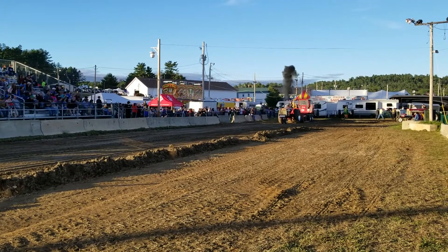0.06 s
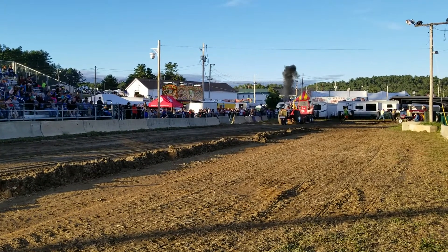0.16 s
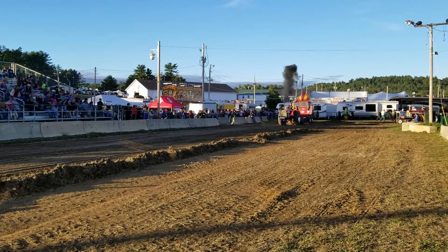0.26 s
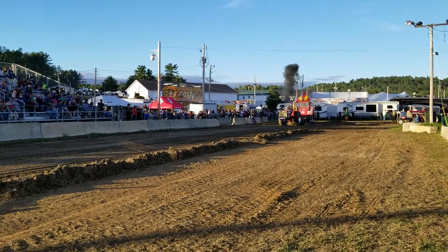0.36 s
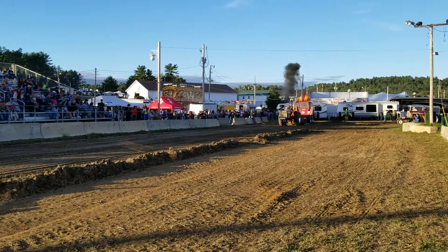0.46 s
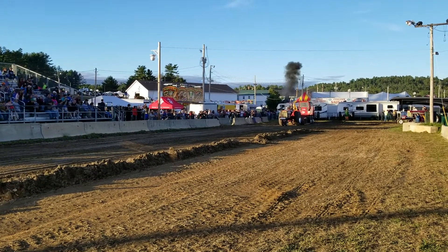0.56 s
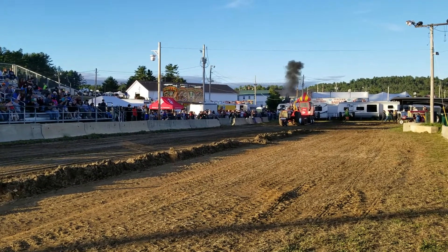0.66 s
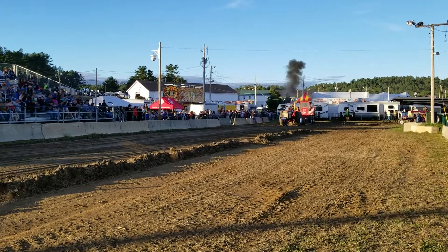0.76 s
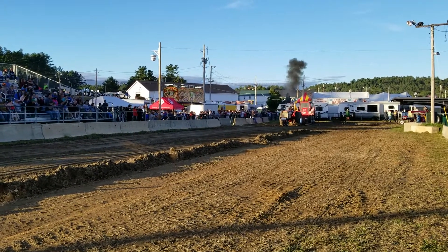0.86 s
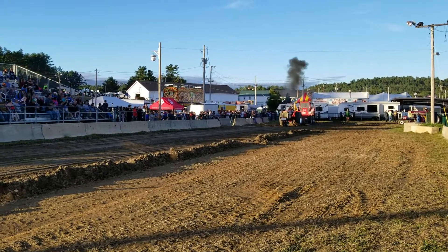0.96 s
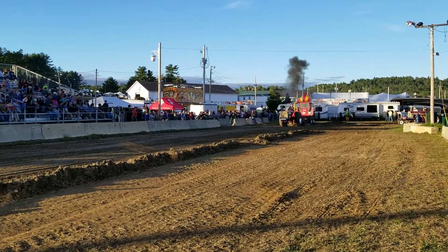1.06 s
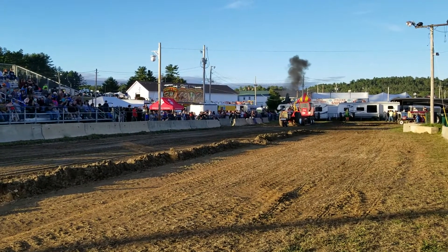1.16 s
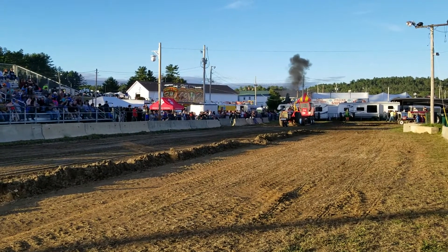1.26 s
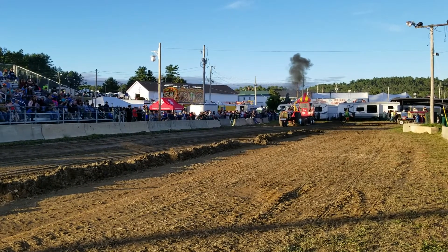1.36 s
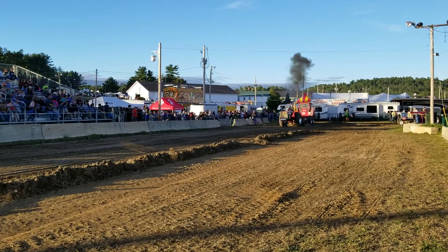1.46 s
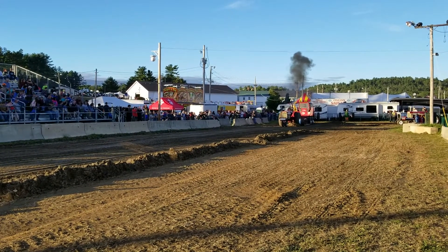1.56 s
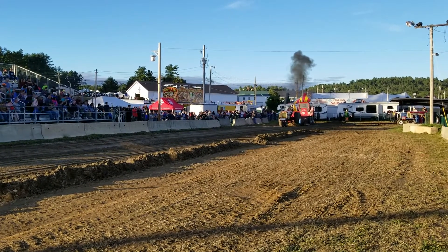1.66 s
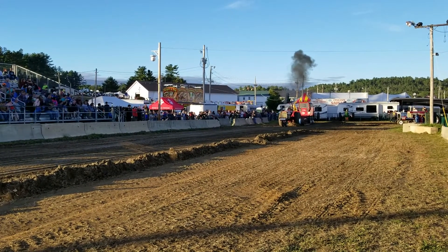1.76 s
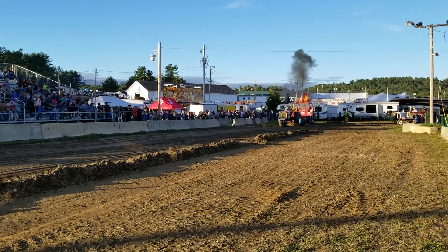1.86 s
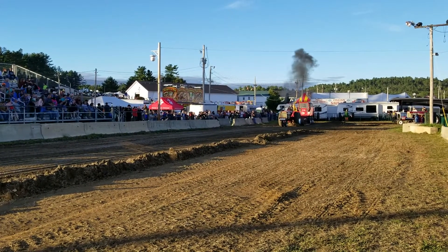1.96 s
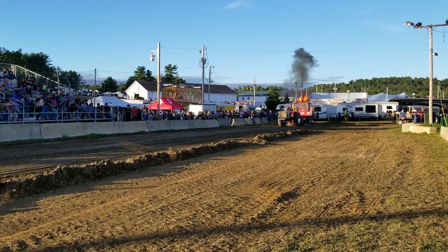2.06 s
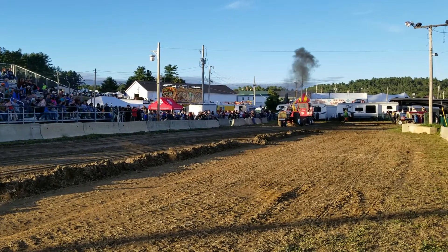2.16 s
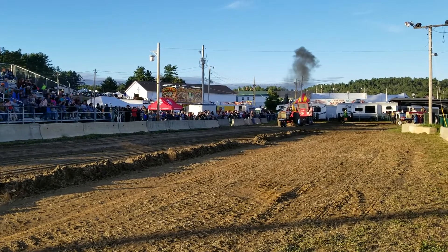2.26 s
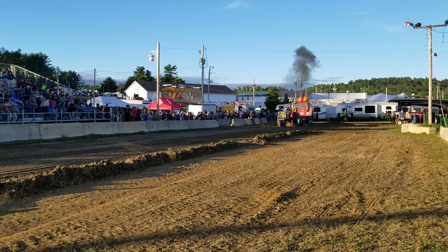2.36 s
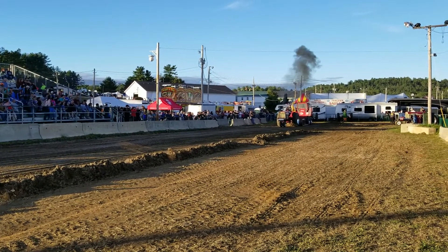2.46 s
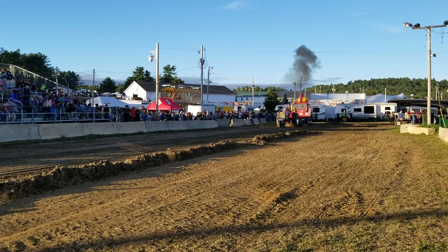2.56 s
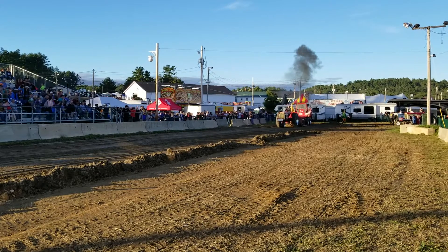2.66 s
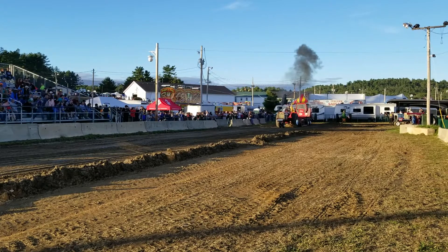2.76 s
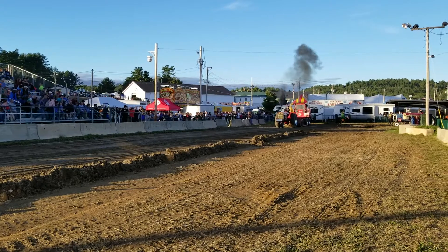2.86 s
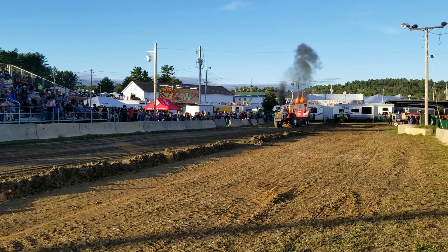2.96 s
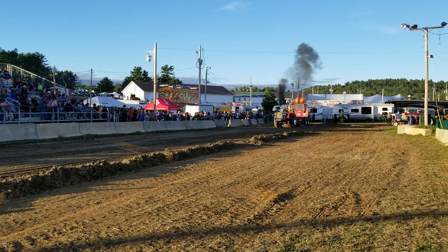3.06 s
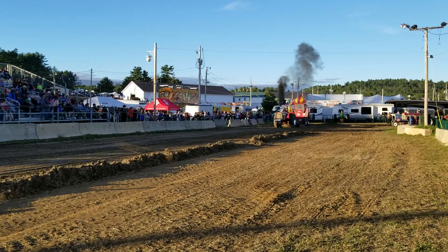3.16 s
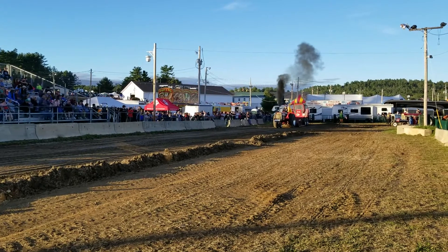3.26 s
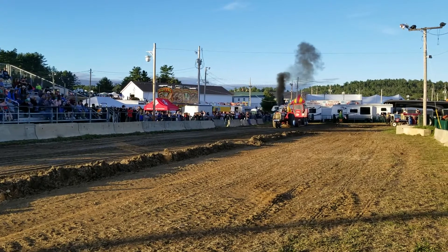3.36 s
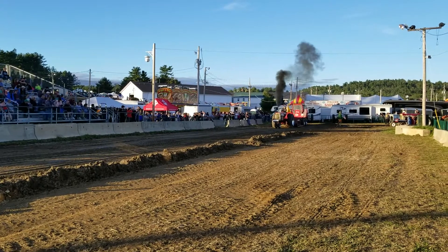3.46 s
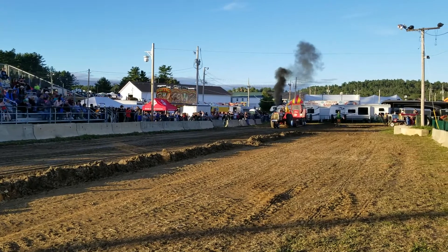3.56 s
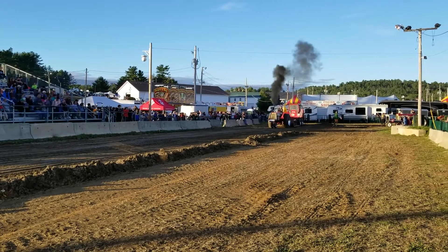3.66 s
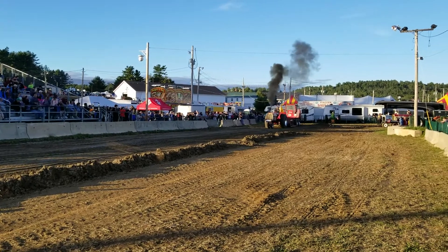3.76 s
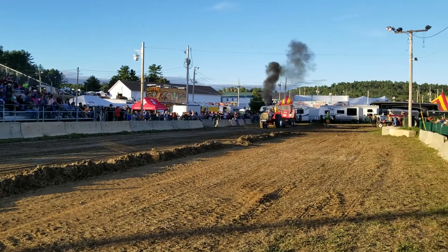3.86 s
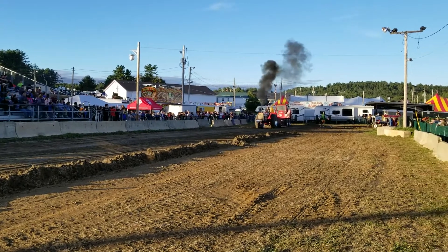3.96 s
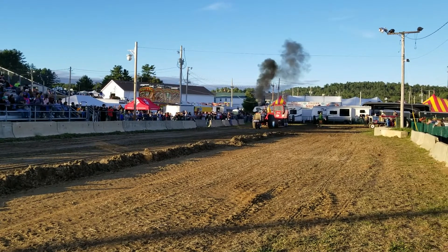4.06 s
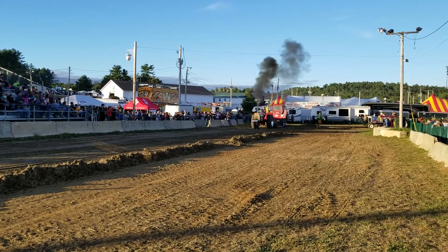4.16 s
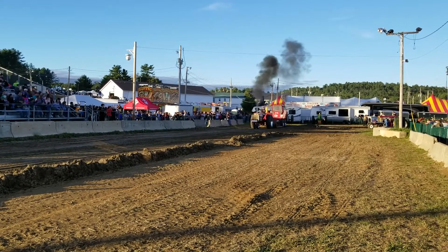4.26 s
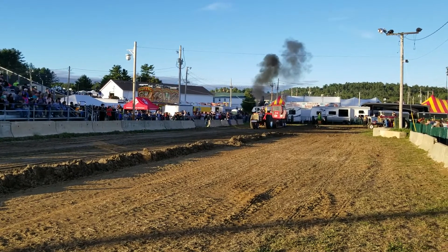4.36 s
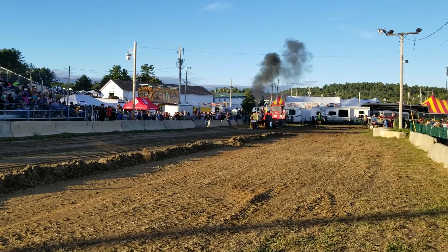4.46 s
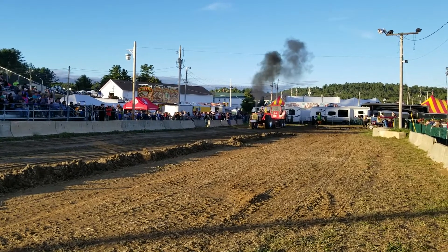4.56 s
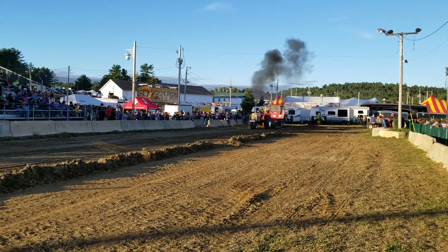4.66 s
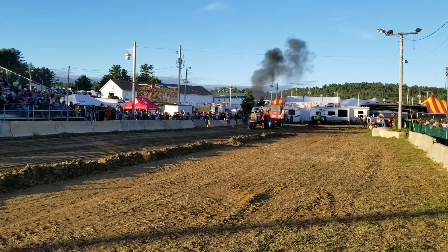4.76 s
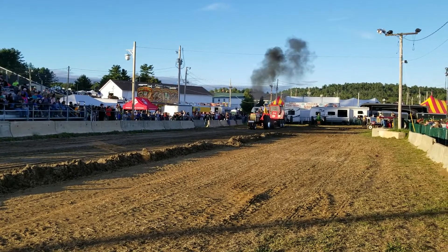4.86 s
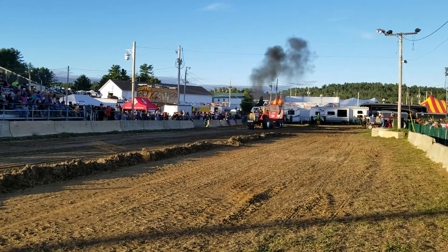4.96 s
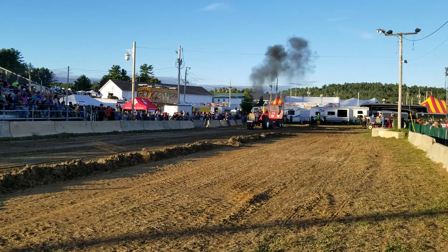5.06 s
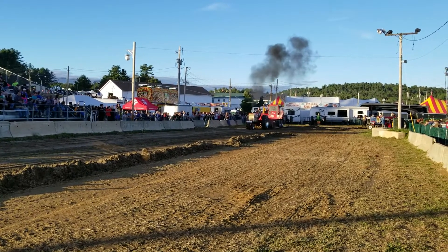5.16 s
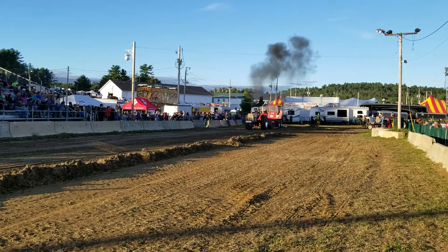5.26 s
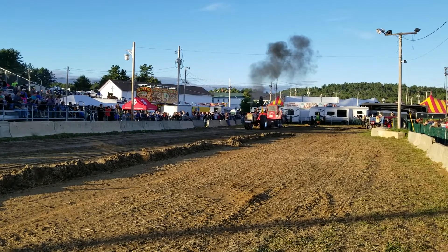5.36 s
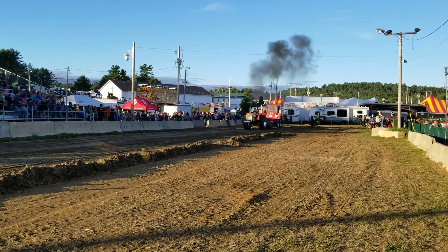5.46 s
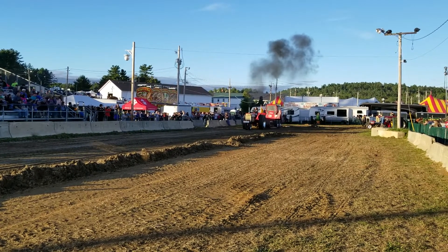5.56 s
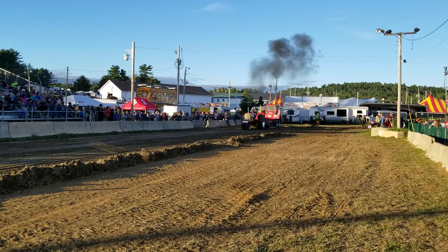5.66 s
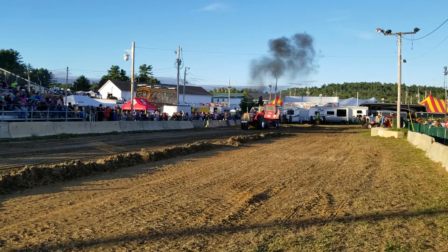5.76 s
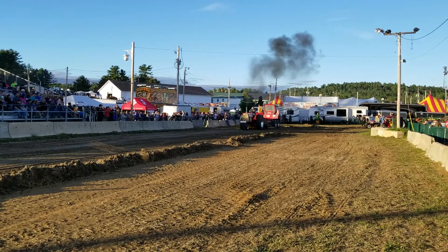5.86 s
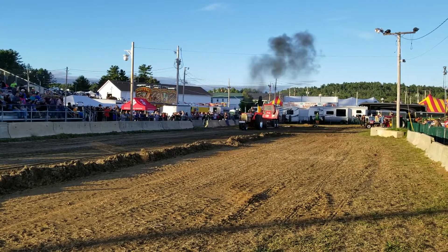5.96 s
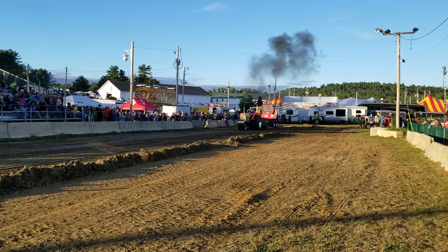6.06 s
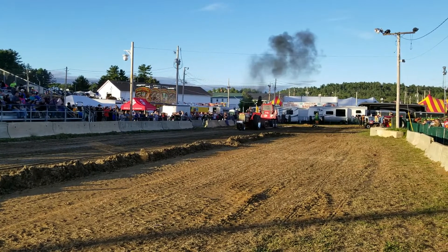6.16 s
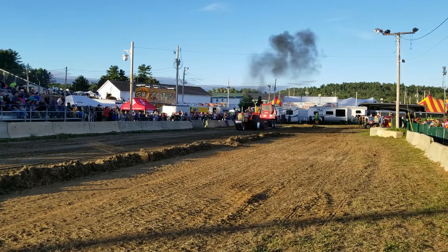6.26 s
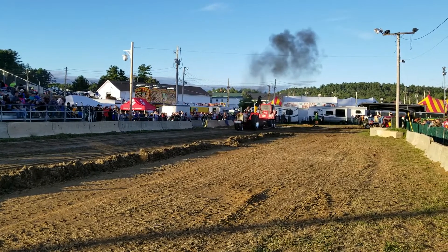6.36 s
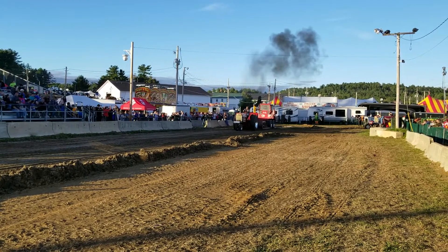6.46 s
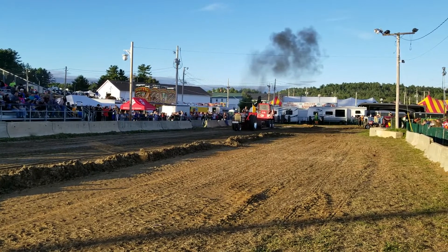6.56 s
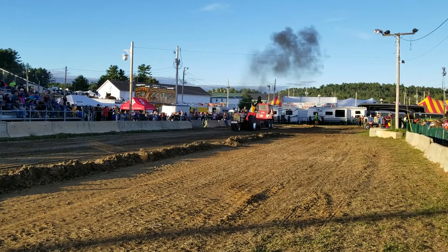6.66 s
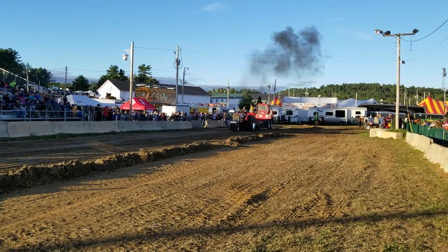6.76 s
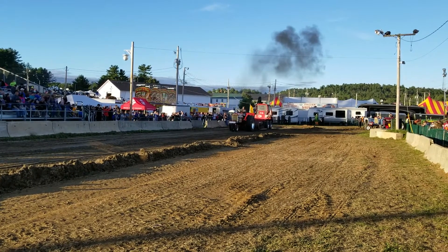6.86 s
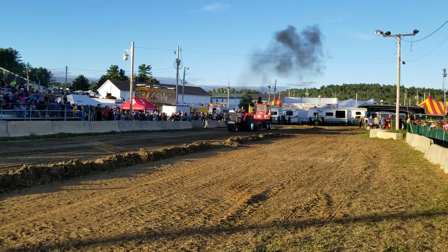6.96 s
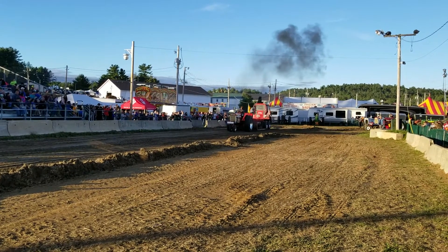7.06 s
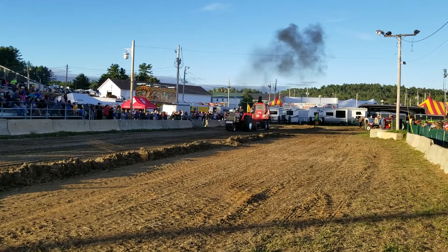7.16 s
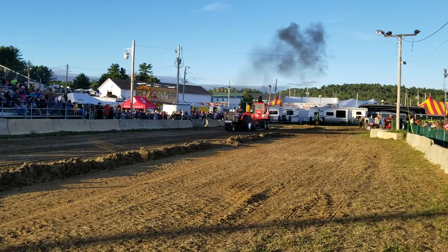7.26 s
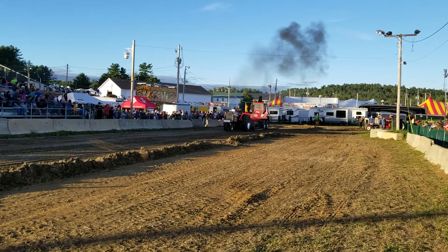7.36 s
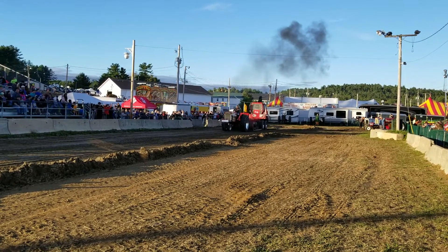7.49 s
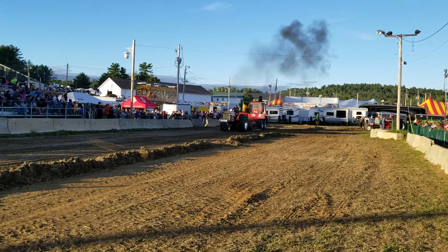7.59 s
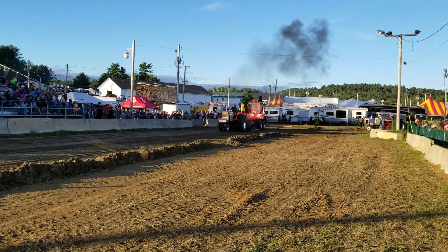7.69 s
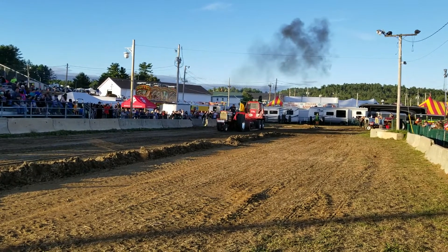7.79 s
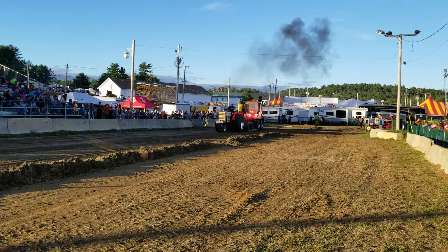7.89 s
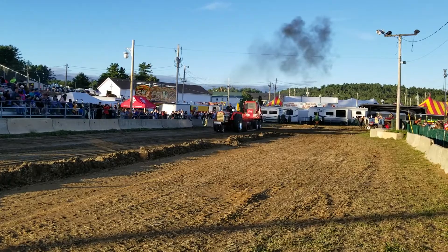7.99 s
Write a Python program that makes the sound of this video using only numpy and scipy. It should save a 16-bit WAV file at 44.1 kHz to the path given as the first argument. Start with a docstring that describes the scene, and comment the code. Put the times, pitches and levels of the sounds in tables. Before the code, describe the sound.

A large six-cylinder turbo diesel tractor is heard across an open dirt track, already revving fast at 0 s. Its exhaust is a rough, hoarse roar with a fluttering hum around 155 Hz. A tiny blip comes at once, a stronger short stab at about 0.2 s, then uneven revving until a swelling, barking burst at 1.6-1.8 s, with a low rumble lingering behind it. Another small stab at 2.6 s leads straight into full throttle at 2.7 s. By 3 s the sled's weight drags the pitch down towards 135-140 Hz, and an enormous, steady drone dominates, with pitched growl, harsh rasp and crackling hiss. It dips lowest near 4.4 s, recovers by 5 s, then wavers in pitch and level. The hiss brightens gradually as it nears. A very thin, fuzzy 12 kHz turbo whistle peaks around 7.5 s. The roar is still going when it stops at 8 s.

```python
"""A six-cylinder turbo diesel on a fairground track, slowly nearing a pair of microphone ports.
It first revs unevenly with short stabs of fuel, then the throttle opens for good and it drags a sled.
Under load sine tones make a huge drone at the firing rate, and sines at cycle harmonics make a growl.
Shaped noise, in one puff of gas a firing, makes the roar, rasp and hiss of the stack.
Late on, a thin turbocharger whistle comes through."""
import sys
import numpy as np
from scipy import signal
from scipy.fft import rfft, irfft
from scipy.io import wavfile
from scipy.ndimage import uniform_filter1d

SR = 44100
rng = np.random.default_rng(int(sys.argv[2]) if len(sys.argv) > 2 else 0)


def wav_out(sig):
    """Save sig, one row per channel (or a flat mono array), as 16-bit PCM at SR to the path in sys.argv[1]."""
    wavfile.write(sys.argv[1], SR, np.round(np.clip(np.atleast_2d(sig).T, -1, 1) * 32767).astype(np.int16))


N = 354123
TIME = np.arange(N) / SR  # s
CYLINDERS = 6
EDGE_HZ = 15750  # upper limit of the band

# Engine speed. Each row: time in seconds, firing rate in Hz.
SPEED = [(0.0, 154.6), (0.15, 147.8), (0.3, 154.2), (0.7, 156.6), (1.1, 161.0), (1.7, 154.5), (2.2, 157.7),
         (2.7, 152.9), (3.05, 142.1), (3.42, 133.9), (3.87, 139.9), (4.1, 136.0), (4.4, 127.3),
         (4.7, 141.1), (5.1, 145.0), (5.55, 144.6), (5.7, 147.9), (5.92, 143.8), (6.2, 145.4),
         (6.38, 136.6), (6.65, 136.6), (6.92, 133.0), (7.15, 140.1), (7.38, 134.9), (7.63, 141.2),
         (7.85, 134.1), (8.03, 147.1)]
# The loudest part of the growl. Each row: time in seconds, centre in Hz, height in dB.
GROWL_PEAK = [(0, 577, 5.5), (1.1, 580, 3), (1.75, 626, 6.5), (2.6, 600, 3.5), (3.3, 640, 2.5),
              (3.8, 660, 5.5), (4.5, 636, 6), (5.3, 604, 4), (6.1, 580, 9.5), (6.6, 640, 0.5),
              (7.5, 668, 6), (8.03, 640, 6)]
# How alike the two ports hear the sound. Each row: frequency in Hz, likeness from 0 to 1.
LIKENESS = [(250, 0.99), (400, 0.88), (700, 0.87), (1300, 0.31), (2250, 0.74), (2650, 0.14), (3000, 0.9),
            (4200, 0.45), (5400, 0.22), (7000, 0.62), (8900, 0.39), (10000, 0.87), (14000, 0.34)]

STAB_FALL_S, STAB_LOAD = 0.048, 0.49  # how fast a stab dies; share of full load at stab strength 1
FULL_S, OPEN_S, SETTLE_S = 2.7, 0.09, 0.3  # the throttle opens for good; its first rush of gas settles
FULL_SURGE = 0.4  # that rush, on the scale of stab strength
HITCH_S, TAKE_UP_S = 2.5, 0.5  # the sled's weight comes onto the engine: start, length
# the firing tone revving free; added by a stab of strength 1; added by the sled's weight
DRONE_FREE_DB, DRONE_STAB_DB, DRONE_LOAD_DB = -22, 14.5, 11
# the firing rates and moments at which the tabled layer levels hold
FREE_HZ, LOADED_HZ, FREE_AT_S, LOADED_AT_S = 156, 139, 1.2, 5
ROUGH_FREE, ROUGH_LOADED, ROUGH_SURGE = 0.48, 0.24, 0.15  # turbulent share of the stack's middle range
BARK_HZ, BARK_DB = 1080, 7  # a hard bark in the rasp as the fuel comes on
DIP_HZ, DIP_HZ_PER_S = 398, 21  # the band that the ground reflection cancels climbs as the tractor nears
# its depth as a share, the extra depth, the moment when it is deepest and the spread around it
DIP_DEPTH, DIP_EXTRA, DIP_DEEPEST_S, DIP_SPREAD_S = 0.12, 0.55, 3.26, 0.75


def drone(firings, load):
    """The clean firing tone and its overtones; off load the fuelling hunts and the tone flutters."""
    # The firing tone under full throttle. Each row: time in seconds, level in dB before flutter.
    full_level = [(2.85, -6), (3.09, -7), (3.23, -5), (4.09, -5), (4.96, -9), (5.22, -13), (5.53, -8),
                  (5.72, -10), (5.82, -7), (6.11, -7), (6.28, -12), (6.37, -7), (6.73, -6), (6.93, -9),
                  (7.28, -6), (7.42, -11), (7.58, -7), (7.67, -13), (7.9, -7), (8.03, -11)]
    flutter = 1 + (0.22 * (1 - load) + 0.012) * drift(22)
    hunting = 1 + 0.13 * (1 - load) * tone(firings / (2 * CYLINDERS))  # once every two engine cycles
    # echoes tilt the wavefront between the ports
    tilt = 0.005 + 0.008 * drift(0.87)
    firings = firings + np.array([[1], [-1]]) * tilt

    free_db = DRONE_FREE_DB + DRONE_STAB_DB * stabs() + DRONE_LOAD_DB * ramp(HITCH_S, TAKE_UP_S)
    firing_db = free_db + (curve(full_level) - free_db) * ramp(FULL_S, OPEN_S)
    firing = amp(firing_db) * flutter * hunting * tone(firings)

    half_db = level("half") + (0.8 + 2.2 * load) * drift(2.5)
    half = amp(half_db) * tone(1.5 * firings + 0.02 * drift(5))  # one and a half times the firing rate
    second_db = level("second") + 1.4 * drift(7.0)
    second = amp(second_db) * tone(2 * firings - 0.11 + 0.04 * drift(1))
    return firing + half + second


def lope(firings, load, rate):
    """Unequal cylinders repeat every engine cycle: its low lines, the third firing harmonic among them."""
    # Low lines of the cycle. Each row: multiple of the engine cycle rate, relative level in dB
    # revving free, relative level in dB under load.
    orders = [(4, -32, -44.5), (5, -32, -50), (7, -33.5, -47), (8, -45.5, -46), (10, -67, -45),
              (11, -37.5, -40), (13, -37, -45), (14, -43.5, -41), (15, -55, -46), (16, -40, -43.5),
              (17, -71, -41), (18, -44, -38.5), (19, -50, -55), (20, -41.5, -42.5), (21, -76, -40),
              (22, -40, -53)]
    out = np.zeros((2, N))
    for order, free_db, loaded_db in orders:
        wave = line(round(order), firings / CYLINDERS, rate, smear=0.025, flicker_db=2.0)
        out += amp(free_db + (loaded_db - free_db) * load) * wave
    return amp(0.8) * out


def growl(firings, rate, width_hz=25.0):
    """The higher cycle harmonics slide through the stack's resonances and a moving peak; rms 1."""
    # The stack's colour on the higher lines. Each row: frequency in Hz, relative level in dB.
    stack = [(420, -13), (520, -3.5), (600, -3), (670, -3), (730, -12), (850, -6), (950, -24.5),
             (1100, -12), (1350, -25.5), (1700, -25)]
    out = np.zeros((2, N))
    peak_hz, peak_db = curve(GROWL_PEAK), curve(GROWL_PEAK, axis=2)
    for order in range(23, 55):
        hz = order * rate / CYLINDERS
        level_db = read(stack, hz) + peak_db * hump(hz, peak_hz, width_hz)
        out += amp(level_db) * line(order, firings / CYLINDERS, rate, smear=0.018, flicker_db=2.4)
    return unit(out)


def pipe(firings, rate, flow):
    """The stack's middle range: a pitched growl mixed with a turbulent roar."""
    # Spectrum of the pipe roar. Each row: frequency in Hz, relative level in dB per Hz.
    roar_spectrum = [(200, -29), (330, -3), (400, -2), (470, 0.5), (600, -2), (780, 1.5), (950, -16),
                     (1400, -41)]
    pull = ramp(HITCH_S, TAKE_UP_S)
    rough = ROUGH_FREE + (ROUGH_LOADED - ROUGH_FREE) * pull + ROUGH_SURGE * surge()
    rough = np.clip(rough, 0, 1)
    peak = curve(GROWL_PEAK), curve(GROWL_PEAK, axis=2)
    roar = gas(roar_spectrum, flow, patchy_db=2.6, peak=peak, width_hz=89.0)
    mix = np.sqrt(1 - rough) * growl(firings, rate) + np.sqrt(rough) * roar
    return amp(level("pipe")) * mix


def jet(flow):
    """Rasp and hiss of the gas jet; tiny shocks make the hiss crackle."""
    # Spectrum of the rasp. Each row: frequency in Hz, relative level in dB per Hz.
    rasp_spectrum = [(300, -43), (560, -27), (800, -9.5), (950, 0), (1130, 3), (1400, -1), (1800, 2),
                     (2020, -3.5), (2330, 2.5), (2650, -7), (2980, 2), (3300, -12.5), (4000, -20),
                     (6000, -38)]
    # Spectrum of the hiss. Each row: frequency in Hz, relative level in dB per Hz.
    hiss_spectrum = [(2600, -27), (3400, -2.5), (4000, -1), (4500, -2.5), (5050, -5), (5600, -8.5),
                     (6200, -13), (7500, -12), (8200, -20.5), (8800, -24.5), (9900, -19), (12400, -17.5),
                     (14000, -28), (15800, -32)]
    # The brightest part of the hiss. Each row: time in seconds, centre in Hz, height in dB.
    hiss_peak = [(0, 4640, 6), (1.7, 4700, 5.5), (2.5, 4660, 2), (2.9, 4700, 7.5), (3.4, 4600, 5),
                 (5, 4530, 4.5), (6.2, 4300, 4.5), (7.1, 4040, 2), (7.45, 5040, 3.5), (8.03, 5130, 3.5)]
    waver_db = 0.37 * drift(16.0)
    shocks = amp(1.6 * unit(uniform_filter1d(rng.standard_normal(N), size=30)))

    bark = np.full(N, BARK_HZ), BARK_DB * surge()
    rasp = gas(rasp_spectrum, flow, patchy_db=0.52, ripple_db=1.8, peak=bark, width_hz=99.0,
               sinking=0.0068)
    bright = curve(hiss_peak), curve(hiss_peak, axis=2)
    hiss = gas(hiss_spectrum, flow * shocks, patchy_db=0.88, ripple_db=3.0, clearing_db=0.6,
               peak=bright, width_hz=420.0)

    rasp_db = level("rasp") + waver_db
    hiss_db = level("hiss") + waver_db + 0.2 * drift(20)
    return amp(rasp_db) * rasp + amp(hiss_db) * hiss


def puffs(firings, load, sharp=0.87, uneven_db=1.3, steady=0.97):
    """One burst of gas a firing, each of its own strength; under load they stand out from the steady flow."""
    index = np.maximum(firings, 0).astype(int)
    strength = amp(uneven_db * rng.standard_normal(N)[index])
    burst = np.exp(sharp * (np.cos(2 * np.pi * (firings - 0.39)) - 1))
    flow = steady + (0.058 + 0.64 * load) * burst * strength
    return flow / np.sqrt(uniform_filter1d(flow ** 2, size=4096))  # hold the running power even


def turbo(width_hz=42.6):
    """A thin whistle, its pitch jittered into fuzz, that comes through as the tractor nears."""
    # The turbocharger's whistle. Each row: time in seconds, pitch in Hz, level in dB before the port trims.
    whistle = [(0, 11500, -90), (5.6, 11800, -75), (6.6, 12050, -60), (7.2, 12110, -51), (7.5, 12110, -42),
               (8.03, 12000, -63)]
    cycles = np.cumsum(curve(whistle) + width_hz * drift(80)) / SR
    ports = np.array([amp(-3) * tone(cycles), amp(-2) * tone(cycles)])
    return amp(curve(whistle, axis=2)) * ports


def rumble():
    """A low rumble: steady noise in the deepest range, its level swelling and sinking."""
    # Spectrum of the rumble. Each row: frequency in Hz, relative level in dB per Hz.
    rumble_spectrum = [(12, -34), (28, -15), (45, -4), (62, -7), (85, 3), (110, 3.5), (165, 7.5),
                       (200, -23), (260, -25)]
    # Level of the rumble. Each row: time in seconds, level in dB before the ground dip.
    shudder = [(0, -30), (.7, -30.5), (1.2, -30), (1.6, -24), (2.3, -25), (2.8, -28), (3.5, -30.5),
               (8.03, -30.5)]
    return amp(curve(shudder)) * gas(rumble_spectrum, 1, patchy_db=0.0, size=4096)


def body(load):
    """Turbulence beneath the firing overtones: low noise, a little louder under load."""
    # Spectrum of this turbulence. Each row: frequency in Hz, relative level in dB per Hz.
    body_spectrum = [(90, -25), (130, 7), (170, -1.5), (210, 0.5), (310, -1.5), (400, -7), (700, -28)]
    return amp(-29.5 + 1.05 * load) * gas(body_spectrum, 1, patchy_db=0.5, size=4096)


def gas(spectrum, flow, patchy_db, ripple_db=0., clearing_db=0., peak=None, width_hz=400., sinking=0.,
        size=1024):
    """Turbulence: noise shaped by the flow, coloured by stack and air, at the two ports; rms 1."""
    # Balance of the ports. Each row: frequency in Hz, left over right in dB for short waves.
    balance = [(200, 1), (600, 3.5), (900, 4.5), (1800, 2), (2100, 0), (2500, 4), (3200, 5), (4200, -3.5),
               (4900, -7), (5800, 1), (7500, 2), (9500, 0), (11600, -9.5), (13800, 2)]
    # Phase between the ports. Each row: frequency in Hz, radians that left leads for short waves.
    port_lead = [(300, -0.23), (700, -0.3), (1000, -0.5), (1800, 0.2), (2300, -0.35), (3300, -1.07),
                 (4100, -1.3), (5500, 0.15), (7500, 1.1), (9800, 1.03), (12000, 4), (15000, 4.5)]
    overlap = size * 3 // 4
    noise = rng.standard_normal((2, N)) * flow
    hz, seconds, (a, b) = signal.stft(noise, SR, nperseg=size, noverlap=overlap)
    hz, t = hz[:, None], seconds - seconds.mean()

    unlike = hz ** 2 / (hz ** 2 + 170 ** 2)  # long waves reach both ports alike
    same = 1 - unlike * (1 - np.clip(read(LIKENESS, hz), 0, 1))
    moving = 2 * np.pi * hz * 8.5e-6 * (t - 0.9)  # the tractor moves leftwards
    lead = unlike * read(port_lead, hz) + moving
    side = amp(unlike * read(balance, hz) / 2)
    right = (same * a + np.sqrt(1 - same ** 2) * b) * np.exp(-1j * lead) / side
    ports = np.array([a * side, right])

    # as the tractor nears, a sinking colour and echo pattern falls in pitch, a clearing treble rises
    shifted = hz * (1 + sinking * t)
    colour_db = read(spectrum, shifted) + ripple_db * echoes(shifted)
    colour_db = colour_db + clearing_db * t * (hz / EDGE_HZ) ** 3
    # past the last point the spectrum falls by 24 dB an octave
    colour_db = colour_db - 24 * np.log2(np.maximum(hz / spectrum[-1][0], 1))
    if peak is not None:
        centre, height_db = (np.interp(seconds, TIME, control) for control in peak)
        colour_db = colour_db + height_db * hump(hz, centre, width_hz)

    # moving air makes patches of time and frequency flicker
    patches = uniform_filter1d(rng.standard_normal(a.shape), size=16, axis=1)
    patches = unit(uniform_filter1d(patches, size=18, axis=0))
    ports *= amp(colour_db + patchy_db * patches)
    return unit(signal.istft(ports, SR, nperseg=size, noverlap=overlap)[1][:, :N])


def line(order, cycles, rate, smear, flicker_db):
    """One harmonic of the engine cycle, wavering on its way through the air, at the two ports."""
    phase = order * cycles + rng.random() + smear * drift(4.9)
    likeness = np.clip(read(LIKENESS, order * rate.mean() / CYLINDERS), 0, 1)
    apart = rng.choice([-1, 1]) * np.arccos(likeness) / (4 * np.pi)  # less alike, further apart in phase
    return amp(flicker_db * drift(3.7)) * np.array([tone(phase + apart), tone(phase - apart)])


def echoes(hz, count=14, spread_s=0.022):
    """Ground, wall and buildings lay a fine ripple of rms 1 over the spectrum."""
    delay, phase = rng.random((2, count))
    ripples = [np.cos(2 * np.pi * (hz * spread_s * (0.15 + d) + p)) for d, p in zip(delay, phase)]
    return unit(sum(ripples))


def ground(x, width_hz=225.0):
    """The ground reflection takes away a narrow band that climbs as the tractor nears."""
    turn = np.exp(2j * np.pi * np.cumsum(DIP_HZ + DIP_HZ_PER_S * TIME) / SR)
    r = np.exp(-np.pi * width_hz / SR)
    # shift the band to 0 Hz, smooth it there, shift it back
    band = 2 * (turn * signal.lfilter([1 - r], [1, -r], x / turn)).real
    depth = DIP_DEPTH + DIP_EXTRA * hump(TIME, DIP_DEEPEST_S, DIP_SPREAD_S)
    return x - np.clip(depth, 0, 1) * band


def stabs():
    """Each stab of fuel swells, holds and is cut."""
    # Short stabs of fuel. Each row: time in seconds, rise in seconds, hold in seconds, strength from 0 to 1.
    stab_rows = [(0.023, 0.013, .02, 0.24), (0.221, 0.032, 0.029, .72), (1.709, 0.16, .06, 0.9),
                 (2.63, 0.022, 0.021, 0.24)]
    total = np.zeros(N)
    for start, rise, hold, strength in stab_rows:
        swell = np.minimum(TIME - start, 0) / rise
        fall = np.maximum(TIME - start - hold, 0) / STAB_FALL_S
        total += strength * np.exp(swell - fall)
    return total


def surge():
    """Extra fuel: the stabs, then the rush as the throttle opens fully."""
    settling = np.exp(-np.maximum(TIME - FULL_S - OPEN_S, 0) / SETTLE_S)
    return stabs() + FULL_SURGE * ramp(FULL_S, OPEN_S) * settling


def level(layer):
    """A layer's level in dB follows load, fuel, engine speed and the tractor's approach over time."""
    # Levels by layer, before any waver or dip. Each row: dB revving free, dB under load, dB added by
    # a surge of strength 1, dB per Hz of firing rate, dB per second as the tractor nears.
    layer_levels = {"half": (-24.5, -36.5, 1, 0.61, 0.7), "second": (-31, -23, 6, -0.11, 0.5),
                    "pipe": (-31, -26.5, 7.5, 0.1, 0.27), "rasp": (-31.5, -28.5, 7, .08, 0.64),
                    "hiss": (-32.5, -27.5, 9, 0.07, 1.07)}
    free_db, loaded_db, surge_db, db_per_hz, db_per_s = layer_levels[layer]
    rate, pull = curve(SPEED), ramp(HITCH_S, TAKE_UP_S)
    free = free_db + db_per_hz * (rate - FREE_HZ) + db_per_s * (TIME - FREE_AT_S)
    loaded = loaded_db + db_per_hz * (rate - LOADED_HZ) + db_per_s * (TIME - LOADED_AT_S)
    return free + (loaded - free) * pull + surge_db * surge()


def ramp(start, length):
    """Rises from 0 to 1 and stays there."""
    return np.clip((TIME - start) / length, 0, 1)


def drift(rate):
    """Slow chance of rms 1, up to about rate changes a second."""
    hz = np.fft.rfftfreq(4096, 1 / 400)  # drawn at 400 points a second
    slow = irfft(rfft(rng.standard_normal(4096)) / (1 + (hz / rate) ** 4))
    return np.interp(TIME, np.arange(len(slow)) / 400, unit(slow))


def tone(cycles):
    """A sine of rms 1."""
    return np.sqrt(2) * np.cos((2 * np.pi * (cycles - np.floor(cycles))).astype(np.float32))


def hump(x, centre, width):
    """A bell around a frequency or a moment, 1 at its top."""
    return np.exp(-0.5 * ((x - centre) / width) ** 2)


def curve(rows, axis=1):
    """One column of a time table at every sample."""
    rows = np.array(rows)
    return np.interp(TIME, rows[:, 0], rows[:, axis])


def read(points, hz):
    """A frequency table read on a log-frequency axis."""
    f, value = np.transpose(points)
    return np.interp(np.log(hz + 1), np.log(f + 1), value)


def amp(db):
    """Decibels to gain."""
    return np.exp(np.asarray(db) * (np.log(10) / 20))


def unit(x):
    """Scales to rms 1."""
    return x / np.sqrt(np.mean(x ** 2) + 1e-20)


def scene():
    """Engine speed and load drive the layers, from the drone down to the rumble."""
    rate = curve(SPEED)
    load = np.clip(ramp(HITCH_S, TAKE_UP_S) + STAB_LOAD * stabs(), 0, 1)
    firings = np.cumsum(rate) / SR  # running count
    flow = puffs(firings, load)
    exhaust = lope(firings, load, rate) + pipe(firings, rate, flow) + rumble() + body(load)
    return drone(firings, load) + ground(exhaust) + jet(flow) + turbo()


def record(dry):
    """The loudest peaks are rounded off; then the band limit."""
    knee = 0.8  # of full scale
    over = np.maximum(abs(dry) - knee, 0)
    held = np.sign(dry) * (abs(dry) - over + (1 - knee) * np.tanh(over / (1 - knee)))
    lowpass = signal.firwin(511, EDGE_HZ, window=("kaiser", 9), fs=SR)
    return signal.oaconvolve(held, lowpass[None], "same")


dry = scene()
out = record(dry)
wav_out(out)
```